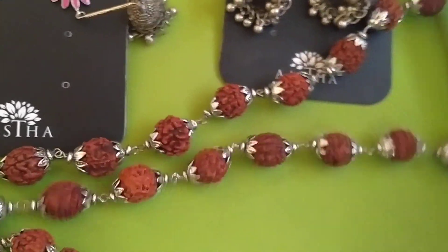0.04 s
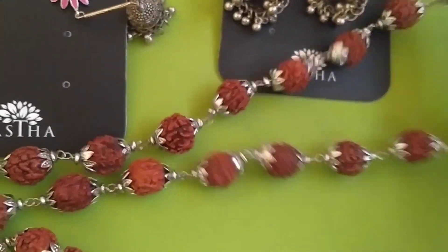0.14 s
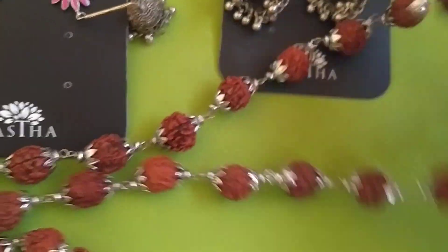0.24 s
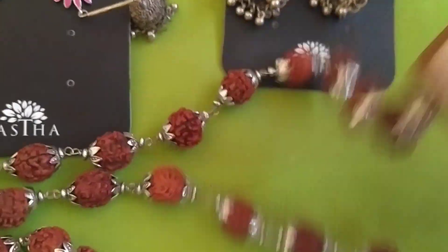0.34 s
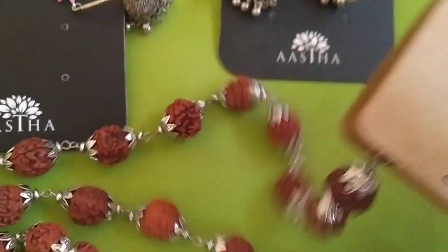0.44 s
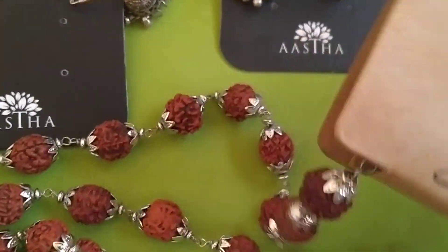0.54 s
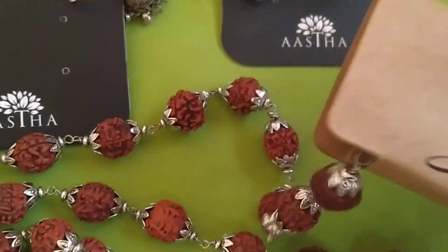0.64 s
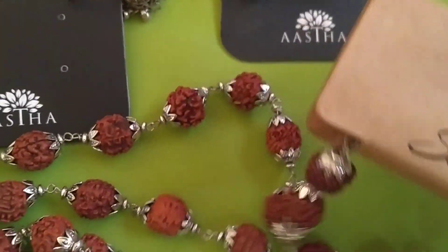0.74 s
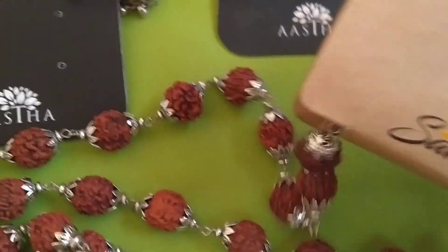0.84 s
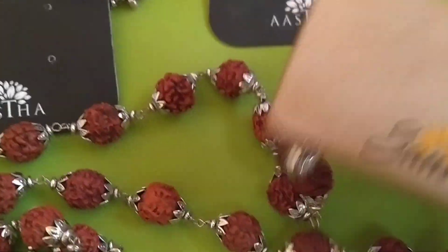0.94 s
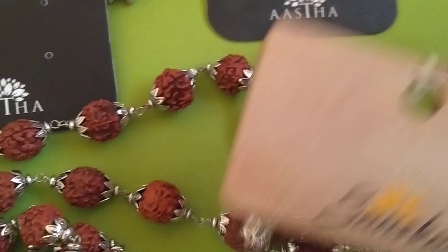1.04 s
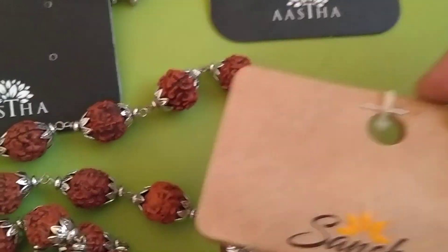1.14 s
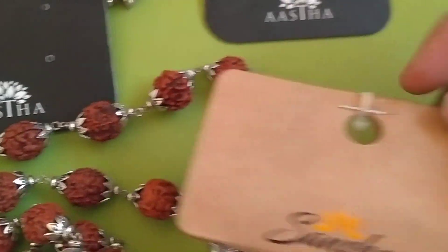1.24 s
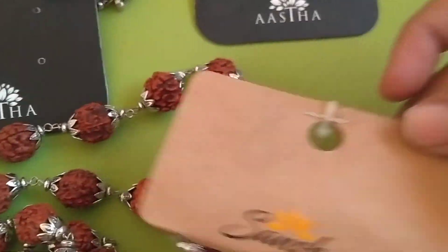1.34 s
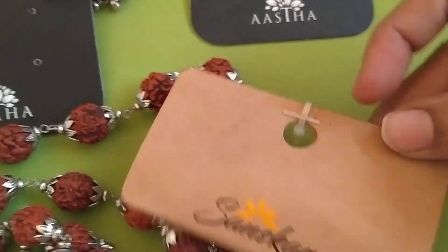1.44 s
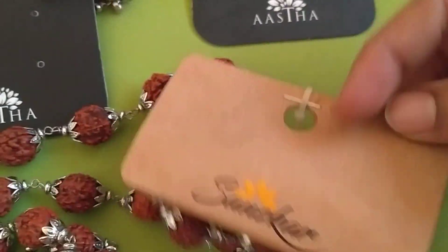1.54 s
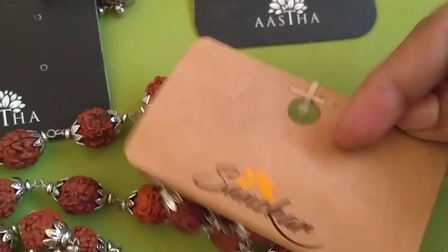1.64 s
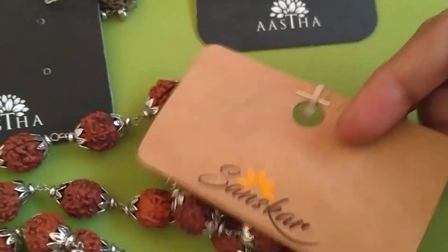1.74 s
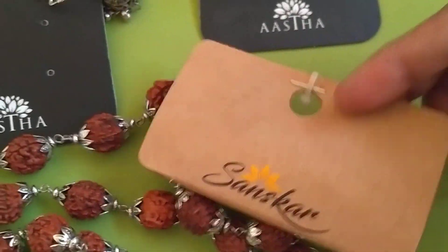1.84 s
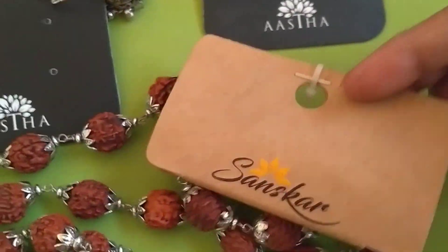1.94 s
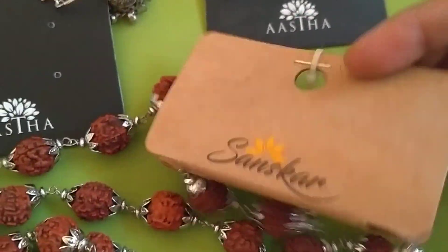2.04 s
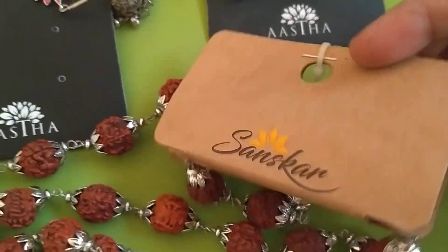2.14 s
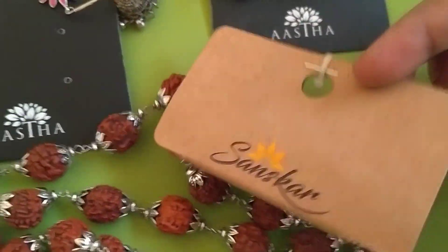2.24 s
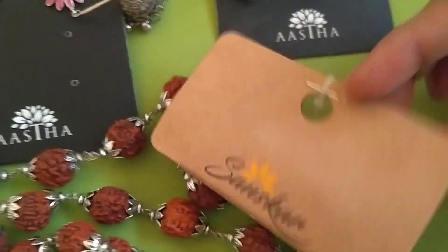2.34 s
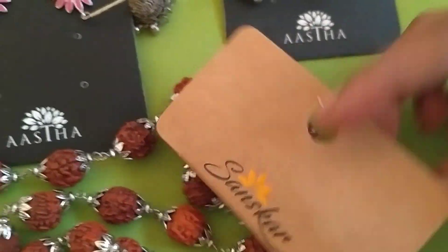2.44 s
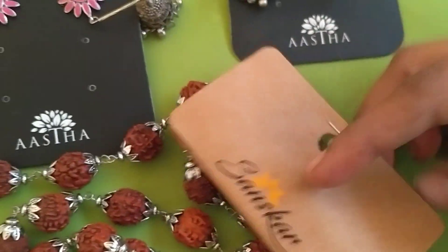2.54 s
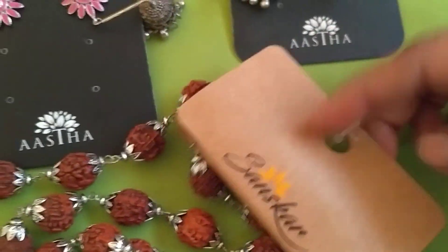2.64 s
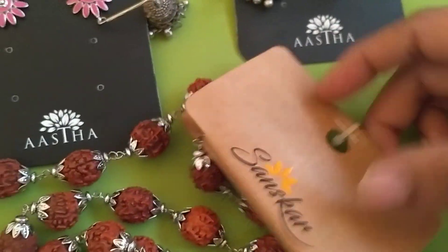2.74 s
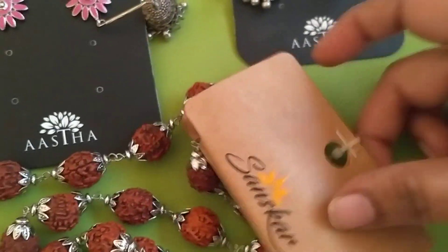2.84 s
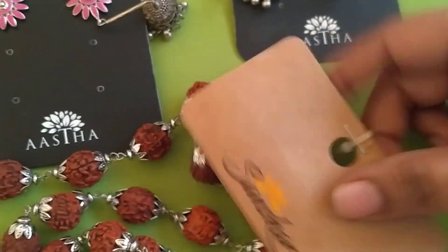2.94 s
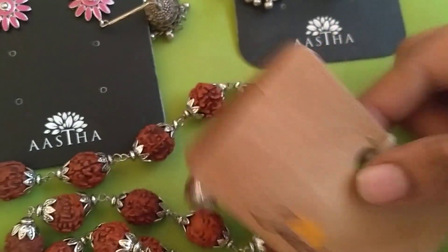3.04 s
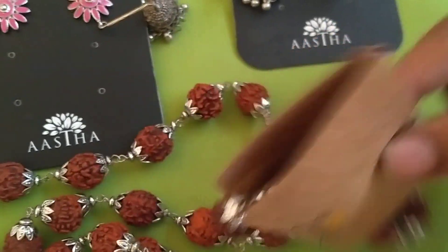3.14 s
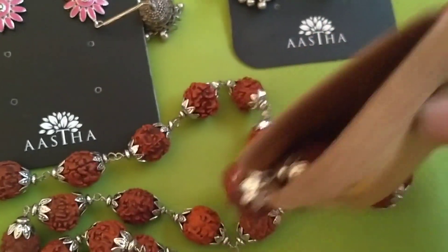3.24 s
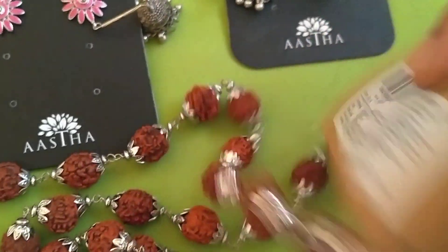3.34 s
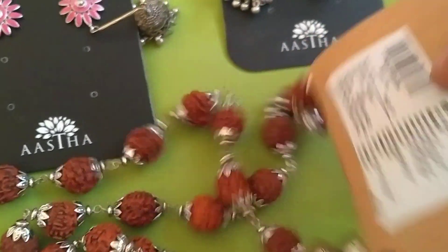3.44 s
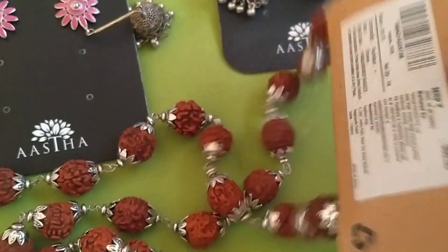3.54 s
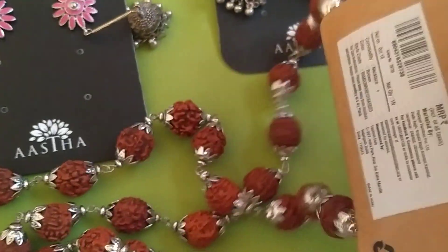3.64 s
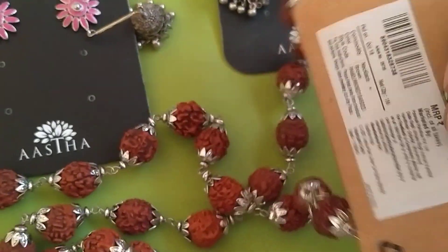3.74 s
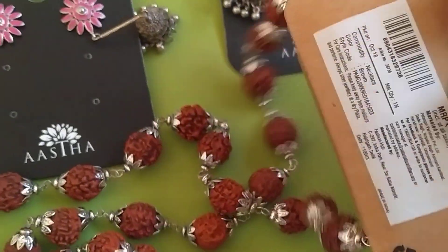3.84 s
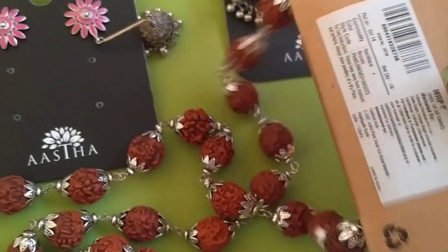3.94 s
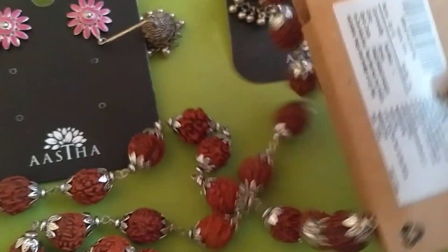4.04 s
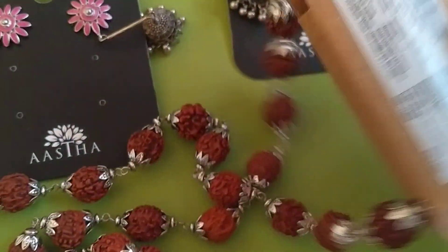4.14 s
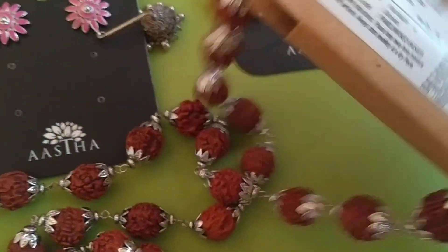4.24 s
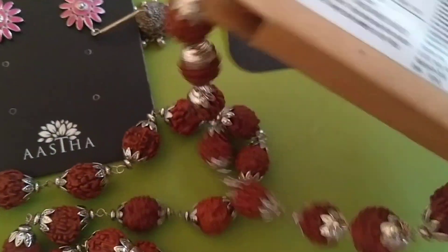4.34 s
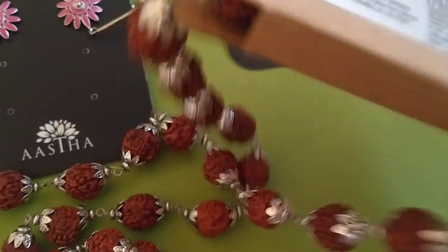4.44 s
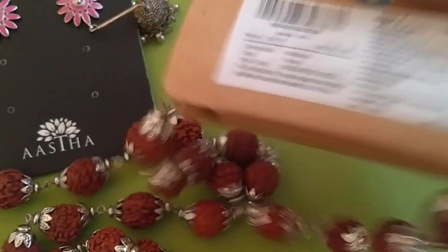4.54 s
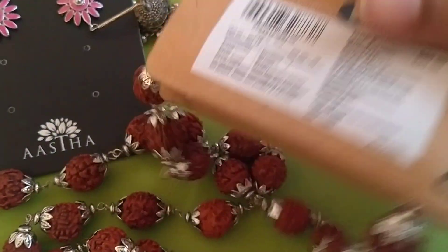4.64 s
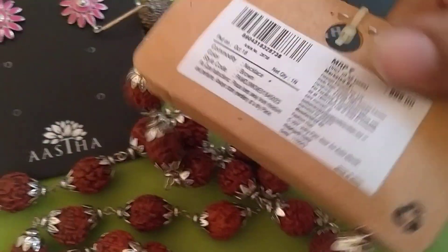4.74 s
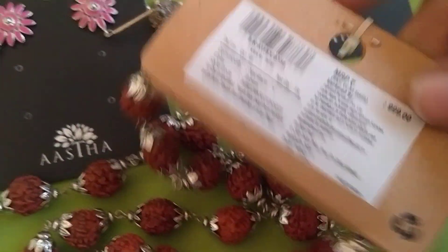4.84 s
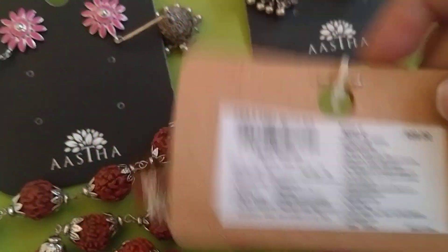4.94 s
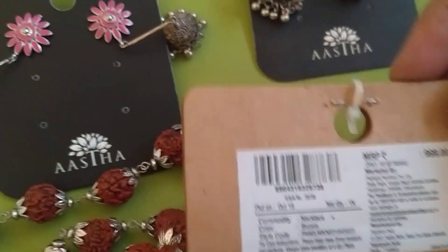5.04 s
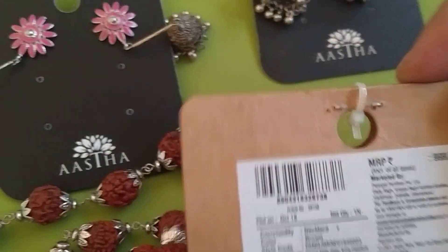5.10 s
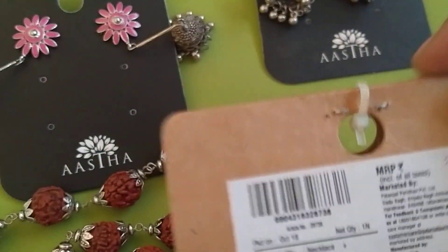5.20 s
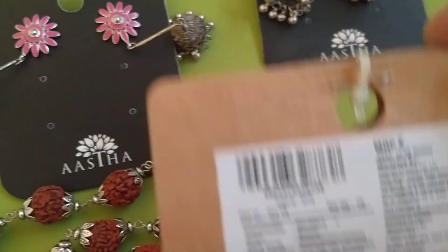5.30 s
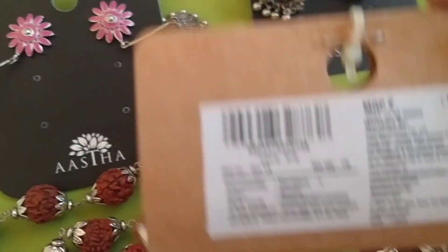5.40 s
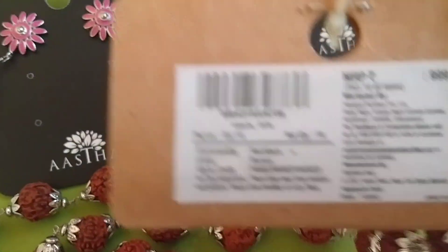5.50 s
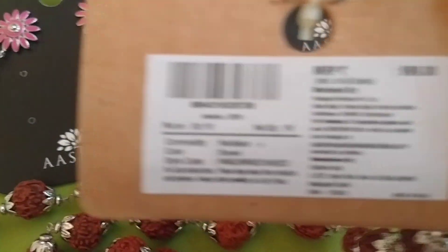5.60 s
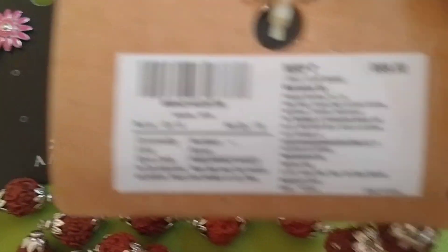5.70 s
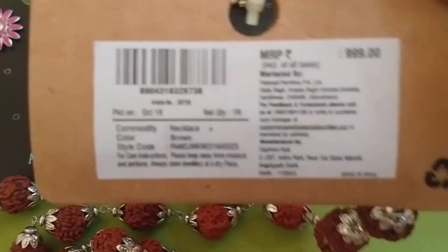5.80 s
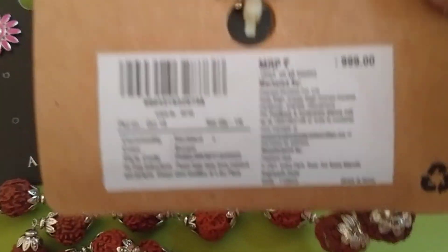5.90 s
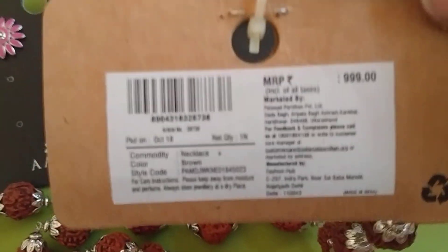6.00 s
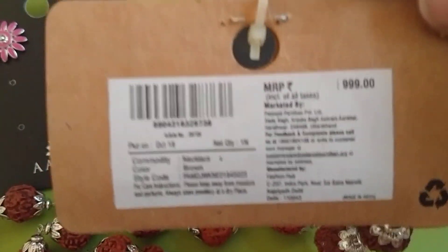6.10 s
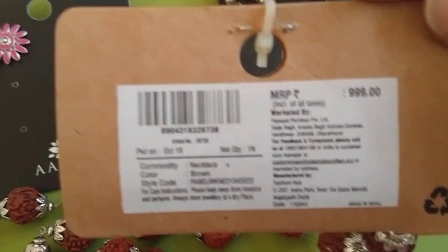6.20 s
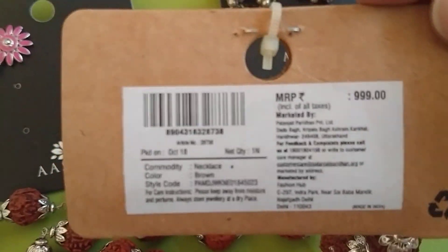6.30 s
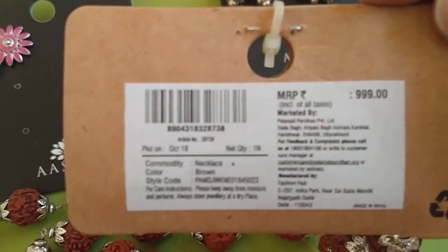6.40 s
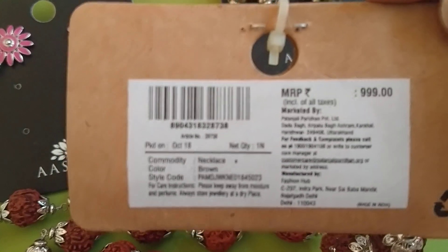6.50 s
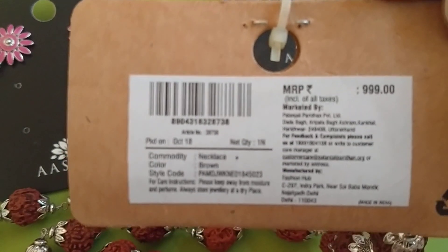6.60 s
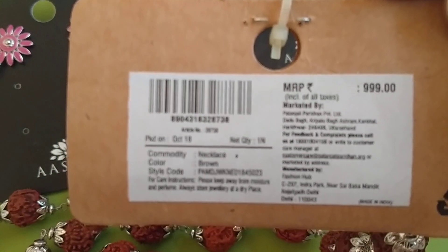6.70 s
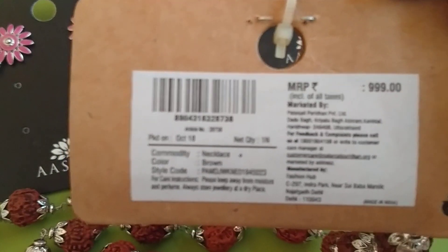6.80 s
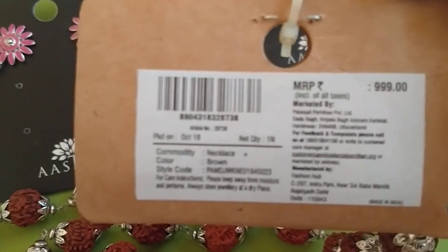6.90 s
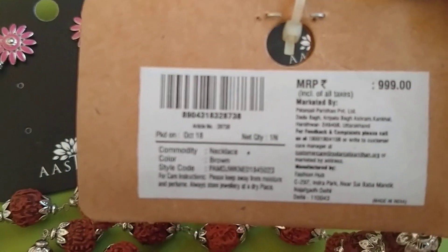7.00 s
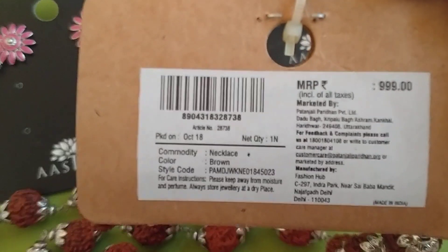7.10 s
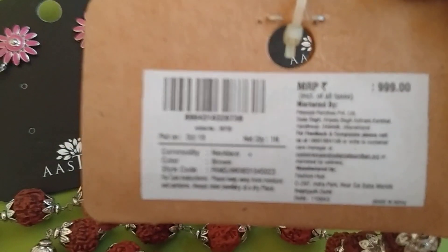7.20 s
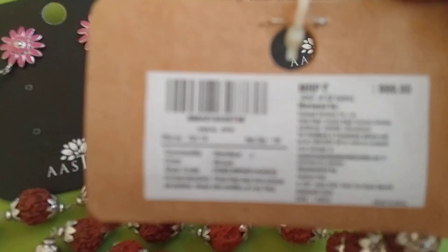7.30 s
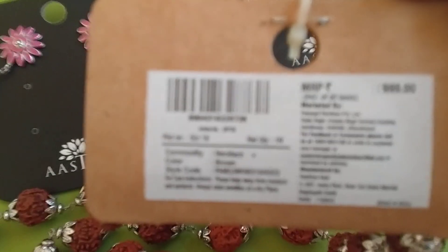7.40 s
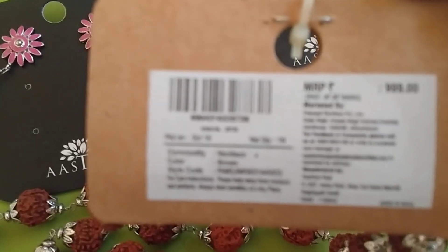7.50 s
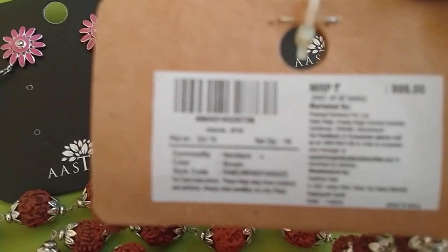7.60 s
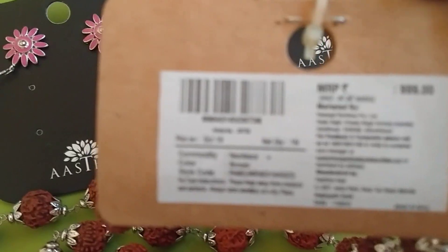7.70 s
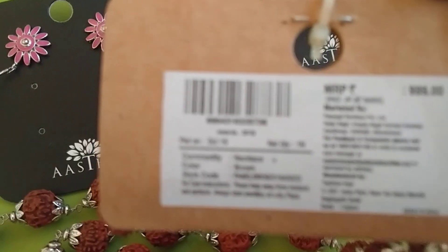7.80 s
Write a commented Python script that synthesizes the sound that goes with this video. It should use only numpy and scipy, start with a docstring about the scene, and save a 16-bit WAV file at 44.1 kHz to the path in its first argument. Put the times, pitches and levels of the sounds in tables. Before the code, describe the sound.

Hard beads knock and rattle irregularly on a tabletop, with small metallic ticks and a light rustle of card in a quiet room.

```python
"""Seed beads on a hollow table

A string of hard beads with metal caps is dragged and dropped while fingers turn its cardboard tag.
Impacts excite the board's short-lived modes; caps, links and card add a thin bright rustle with ticks.
The small room hums, and the close microphone's expander sinks the floor once the hands are still."""
import sys
import numpy as np
from scipy import signal
from scipy.fft import rfft, irfft, next_fast_len
from scipy.io import wavfile
from scipy.ndimage import uniform_filter1d

SR = 44100
rng = np.random.default_rng(int(sys.argv[2]) if len(sys.argv) > 2 else 0)


def digitize_waveform(pressure):
    """Quantize a signal to 16-bit integers and store it at the path in sys.argv[1].

    Rows of a 2-D input are taken as channels; values are limited to [-1, 1].
    """
    field = np.atleast_2d(pressure).T
    bounded = np.clip(field, -1, 1)
    quanta = np.round(bounded * 32767).astype(np.int16)
    wavfile.write(sys.argv[1], SR, quanta)


N = 346405

# Bead impacts. Each row: start in seconds, level in dB, gain of the modes above 1.8 kHz in dB.
BEAD_KNOCKS = [(0.106, -32, -26), (0.131, -20, -27), (0.162, -19, -25), (0.195, -25, -23), (0.279, -26, -7),
               (0.329, -27.5, -9), (0.368, -25.5, -21), (0.409, -30, -10), (0.468, -14.5, -17.5),
               (0.497, -24.5, -18), (0.525, -11, -17.5), (0.557, -14.5, -21.5), (0.583, -19, -19),
               (0.607, -15.5, -32), (0.653, -23.5, -7), (0.846, -29, -12), (0.9, -33, -9),
               (0.916, -20, -13.5), (0.993, -31, -29), (1.12, -35, -21), (1.132, -32.5, -9),
               (1.159, -34, -8), (1.172, -31.5, -6), (1.198, -11, -10), (1.219, -25, -16),
               (1.243, -25, -30), (1.28, -31, -30), (1.316, -30.5, -29), (1.357, -27.5, -33),
               (1.417, -37, -18), (1.449, -39, -4), (1.501, -33, -25), (1.519, -23, -21), (1.6, -23.5, -18),
               (1.692, -27.5, -12), (1.777, -23.5, -27), (1.795, -17, -23), (1.824, -26.5, -18),
               (1.866, -25.5, -18), (1.892, -27, -20), (1.904, -25, -6), (2.145, -31, -18),
               (2.169, -21.5, -15), (2.211, -13.5, -10.5), (2.267, -29.5, -15), (2.338, -27.5, -21),
               (2.355, -31, -4), (2.367, -22, -11.5), (2.445, -47, -6), (2.473, -16, -8.5),
               (2.498, -17, -7.5), (2.516, -25, -14), (2.535, -33, -23), (2.611, -28.5, -16),
               (2.871, -32, -14), (2.919, -31, -19), (2.976, -35.5, -4), (3.031, -34, -14),
               (3.045, -20, -15), (3.092, -34, -31), (3.119, -43, -15), (3.148, -13, -25),
               (3.163, -13, -12), (3.177, -11, -12), (3.218, -21, -14), (3.231, -18, -19),
               (3.269, -14.5, -14), (3.286, -16, -6), (3.308, -16, -10), (3.323, -26, -23),
               (3.39, -31, -21.5), (3.457, -44, -22.5), (3.482, -31, -5), (3.501, -14.5, -14),
               (3.518, -19, -10), (3.531, -14.5, -17), (3.58, -12.5, -20), (3.597, -13.5, -11),
               (3.646, -15, -14), (3.677, -15, -23), (3.696, -22, 1), (3.808, -34, -10), (3.831, -36.5, 3),
               (3.9, -37, -12), (3.932, -31, -19), (3.986, -18.5, -12.5), (4.105, -41, 12.5),
               (4.233, -13, -12.5), (4.273, -24, -30), (4.35, -30.5, -4), (4.447, -30.5, -19.5),
               (4.548, -33, -12), (4.576, -20.5, -13), (4.622, -10.5, -18.5), (4.65, -21.5, -18),
               (4.669, -11.5, -1), (4.673, -10, -9.5), (4.691, -9, -13), (4.695, -16, -6),
               (4.729, -20.5, -11.5), (4.819, -15, -19), (4.957, -32.5, -22), (4.993, -34, -18),
               (5.006, -35, -24), (5.075, -30, -16), (5.087, -37, -8), (5.118, -24, -17), (5.137, -21, -36),
               (5.227, -34.5, -14), (5.249, -46, -12), (5.286, -31, -10), (5.299, -35, -11),
               (5.37, -40.5, -14), (5.441, -36.5, -9), (5.571, -44, 4.5), (5.649, -49, -7),
               (5.979, -57.5, -23)]
# Modes of the table top. Each row: frequency in Hz, relative level in dB, T60 in seconds.
BOARD_MODES = [(200, -20.5, .05), (310, -35, 0.032), (396, -1.5, 0.063), (514.3, -13, 0.088),
               (643, -2, 0.081), (706, -4.5, 0.061), (784, 2.5, 0.043), (901, -5, 0.061), (1041, 2.5, 0.03),
               (1193, -1, 0.042), (1329, -9.5, 0.088), (1493, -11, 0.071), (1614, 3, 0.013),
               (1897, -0.5, 0.043), (2130, 5, 0.022), (2356, 8.5, 0.011), (2693, -10, 0.066),
               (2810, 0.5, 0.016), (3064, -10.5, 0.048), (3400, -1, 0.0083), (3870, -15.5, 0.021)]
def board(rattling, bright_share, bump_gap_s=.003):
    """Modal excitation: knocks and rattle drive each mode with a strength set by the spot struck."""
    start, knock_db, high_db = np.transpose(BEAD_KNOCKS)
    gaps = bump_gap_s * rng.random((len(start), 3))   # a knobbly bead lands on four bumps in turn
    delays = np.cumsum(np.c_[0 * start, gaps], axis=1)
    bumps = np.round((start[:, None] + delays) * SR).astype(int)
    coupling = 0.16 + 0.49 * rng.normal(0, 1, (len(start), 4, len(BOARD_MODES)))
    rattle, spot = contacts(per_s=2300, spread_db=2.0), rng.standard_normal(N)
    rolled, knocked = np.zeros(N), np.zeros(N)
    for k, (hz, mode_db, t60) in enumerate(BOARD_MODES):
        share_db = -22.5 if hz < 450 else high_db if hz > 1800 else 0
        rattle_share = from_db(-13) if hz < 450 else bright_share if hz > 1800 else 1
        strength = from_db(knock_db + share_db + mode_db - 5.5)
        impulses = np.zeros(N)
        impulses[bumps] = coupling[..., k] * strength[:, None] * [0.82, -0.29, 0.3, -.35]
        knocked += ring(impulses, hz, t60)
        taps = rattle * np.roll(spot, 997 * k) * from_db(mode_db) * rattle_share
        rolled += ring(taps, hz, 0.79 * t60)
    running_rms = np.sqrt(uniform_filter1d(rolled ** 2, size=1500))
    vibration = knocked + rattling * rolled / running_rms   # the hand sets the strength, not the count
    soft_contact = signal.butter(4, 4300, fs=SR, output="sos")       # seed on wood
    radiation = signal.butter(4, 260, "high", fs=SR, output="sos")   # a small board radiates no bass
    return signal.sosfilt(np.r_[soft_contact, radiation], vibration)


def settling(t60=0.18):
    """Exponential decay: the envelope of neighbouring beads that each knock jolts."""
    start, knock_db, _ = np.transpose(BEAD_KNOCKS)
    jolts = np.zeros(N)
    jolts[np.round(start * SR).astype(int)] = from_db(knock_db - 17)
    return signal.lfilter([1], [1, -from_db(-60 / (t60 * SR))], jolts)


# Pulls on the string and turns of the tag. Each row: start and length in seconds,
# then levels in dB of the rattle, the rustle and the rattle above 1.8 kHz.
HAND_PULLS = [(.0, 0.16, -57.5, -59, -53), (0.138, 0.029, -37, -64, -46), (0.246, 0.14, -44, -88, -64),
              (0.35, 0.016, -45, -62, -51), (0.509, 0.12, -35, -57, -42), (0.914, 0.065, -46, -64, -62),
              (1.13, 0.032, -57, -72, -67), (1.211, 0.02, -43, -59.5, -70), (1.533, 0.079, -46.5, -71, -67),
              (1.777, 0.2, -48, -66.5, -63), (2.171, 0.074, -46.5, -65, -63), (2.364, 0.025, -52, -64, -65),
              (2.494, 0.034, -34.5, -55, -45), (2.604, 0.029, -46, -67.5, -63),
              (2.886, 0.02, -47.5, -59.5, -53.5), (3.069, 0.056, -68, -55.5, -68),
              (3.148, 0.031, -28, -46, -48), (3.227, 0.061, -28.5, -47.5, -36), (3.5, 0.09, -31, -50, -42),
              (3.66, 0.072, -43.5, -62, -51), (3.814, 0.025, -47.5, -65, -54),
              (3.966, 0.019, -60, -56.5, -68), (4.063, 0.038, -55, -58, -57),
              (4.168, 0.02, -37.5, -65, -53), (4.243, 0.028, -45.5, -54.5, -53),
              (4.416, 0.2, -49, -63, -68), (4.609, 0.013, -45.5, -43, -51),
              (4.688, 0.036, -29.5, -42, -32.5), (4.827, 0.26, -51, -56, -73), (5.12, .03, -58, -71, -66),
              (5.2, 0.16, -51, -78.5, -66), (5.58, 0.039, -67, -74, -66.5), (5.713, .03, -62.5, -80, -83),
              (6.05, .05, -77, -90.5, -83)]
# The held string is never quite still. Each row: time in seconds, then the same three levels in dB.
HAND_UNREST = [(0, -75, -73, -70), (1.1, -71, -76, -85), (1.6, -48.5, -76, -65), (2.1, -62.5, -90, -74),
               (3.0, -71, -74, -72.5), (3.9, -54.5, -65.5, -70), (4.5, -49.5, -73.5, -62),
               (5.3, -62, -73.5, -68.5), (5.8, -74.5, -89, -82), (6.3, -81.5, -94.5, -99.5)]
def pulling(layer, rise_db_per_s=204, fall_db_per_s=110):
    """Addition of powers: a layer's envelope, as pulls swell, hold and fade over the restless string."""
    t = np.arange(0, N, 32) / SR
    power = from_db(2 * level_curves(HAND_UNREST)[layer][::32])
    for start, length, *levels_db in HAND_PULLS:
        rise_db = rise_db_per_s * np.maximum(start - t, 0)
        fall_db = fall_db_per_s * np.maximum(t - start - length, 0)
        power += from_db(2 * (levels_db[layer] - rise_db - fall_db))
    return np.interp(np.arange(N) / SR, t, np.sqrt(power))


# Spectrum of card, caps and links. Each row: frequency in Hz, relative spectral density in dB.
RUSTLE_SPECTRUM = [(1880, -10), (3200, 3), (3400, -0.5), (4070, -11), (5110, -7.5), (5570, -10.5),
                   (6280, -9.5), (6900, -10.5), (7430, -6.5), (7890, -10.5), (8660, -3), (10400, -13.5),
                   (11600, -16.5), (15100, -11), (15800, -24.5)]
def rustle(ring_cycles=90):
    """Friction noise: card and fingers slide with a hiss while random contacts ring the links."""
    glints, link_struck = contacts(per_s=810, spread_db=4.5), rng.integers(0, 18, N)
    links = 0
    for k, hz in enumerate(np.geomspace(4400, 14500, num=18)):
        level_db = np.interp(hz, *np.transpose(RUSTLE_SPECTRUM))
        links += from_db(level_db) * ring(glints * (link_struck == k), hz, ring_cycles / hz)
    return unit_rms(shaped_noise(RUSTLE_SPECTRUM) + from_db(-8.5) * unit_rms(links))


# Ticks of caps and card edge. Each row: start in seconds, level in dB, clink frequency in Hz,
# relative clink level in dB, treble tilt about 8 kHz in dB.
EDGE_TICKS = [(0.0179, -51, 8700, -11, 3), (0.0355, -42.5, 4530, -3, 0), (0.316, -53, 4700, -1, -2),
              (0.3325, -36.5, 4500, -11, -4), (0.4145, -40.5, 4470, -2, -6), (0.4678, -33, 4800, -17, -5),
              (0.5063, -38, 4590, -8, -4), (0.5252, -40, 4340, -1, -2), (0.5624, -47, 5210, -3, 1),
              (0.6572, -43.5, 8510, -1, 3), (0.7811, -52, 7280, -11, 4), (0.9014, -54, 4350, -7, 3),
              (0.9742, -52, 8590, -2, 1), (1.1223, -57, 7000, -5, 2.5), (1.1737, -53, 4600, -5, 3),
              (1.1985, -31, 8470, -15, 6), (1.3465, -59, 8710, -5, 6), (1.3553, -60, 5750, -7, 5),
              (1.5212, -43.5, 4560, 2, -9), (1.5999, -40.5, 4670, -7, -3), (1.6556, -55, 8000, -5, 3),
              (1.6901, -54.5, 4600, -2, 1), (1.7923, -40, 4870, 4, 2), (1.8248, -42.5, 5200, 3, -1),
              (1.8552, -40.5, 5800, 3, 4), (1.8896, -41, 5100, -4, 1), (1.9044, -48, 8400, -5, 3),
              (2.145, -53, 8600, -13, 6), (2.17, -53, 9010, -5, 3), (2.2099, -35.5, 8300, -4, 1),
              (2.356, -40, 9020, -9, -2), (2.4457, -48, 8510, -7, 3), (2.4743, -32.5, 4800, -1, -1),
              (2.5003, -30, 5160, -17, 1), (2.5411, -47, 9000, -1, 3), (2.6584, -50, 8820, -11, 1),
              (2.8055, -63, 6540, 2, 1), (2.8475, -52, 6500, -1, 0), (3.029, -54, 4830, -7, 1),
              (3.049, -41, 8200, -2, 2), (3.0844, -44, 8900, -4.5, 5), (3.1552, -35, 4730, -1, -10),
              (3.1794, -24.5, 4740, -16, -5), (3.2296, -34, 4750, 1, -1), (3.2414, -32, 4740, 0, 1),
              (3.2868, -34, 4650, 4, 0), (3.4487, -44, 9160, -5, 6), (3.4815, -39, 4800, -3, 3),
              (3.4944, -39.5, 4990, -5, 3), (3.5572, -29, 6700, -5, 3), (3.5964, -41, 4830, -5, 5),
              (3.7, -35, 4760, -2, -3), (3.7918, -49, 5660, -3, -1), (3.8327, -40.5, 5070, -1, -7),
              (3.85, -44.5, 4650, 1, -2), (3.9444, -50, 9460, -5, 3), (3.9759, -46, 9500, 5, 7),
              (4.06, -42, 8700, -12, 3), (4.0996, -38, 9800, 1, 8), (4.1065, -36, 8100, 1, 8),
              (4.232, -41, 9400, -10, 6), (4.3784, -48.5, 8800, -5, 1), (4.4024, -53, 8580, -5, 6),
              (4.4283, -51, 9000, -9, 3), (4.5062, -50, 8400, -7, 8), (4.563, -45.5, 5150, -5, 3),
              (4.5754, -39.5, 5115, -3.5, 6), (4.6134, -32.5, 5190, -5.5, 0), (4.6743, -19.5, 8200, 0, -3),
              (4.6967, -19, 5040, -2, -8), (4.82, -35.5, 4250, 1, -2), (4.8484, -42, 8600, -5, 3),
              (5.0649, -47, 8740, 4, 6), (5.1372, -54, 4320, -5, 3), (5.3083, -55, 8960, -5, 3),
              (5.5712, -57, 9040, -5, 6), (5.7207, -56, 10400, 5, 6), (5.7354, -54, 8600, -1, 11),
              (5.7514, -58, 8600, -5, 9), (6.3854, -58.5, 8990, -4.5, 3.5)]
def ticks(burst_t60=0.021, clink_t60=0.0088):
    """Impact transients: each is a broadband burst and the brief ring of two modes of a cap."""
    out, hiss = np.zeros(N), shaped_noise(RUSTLE_SPECTRUM)
    dull = signal.sosfilt(signal.butter(2, 8000, fs=SR, output="sos"), hiss)
    t = np.arange(4000) / SR
    attack = 1 - np.exp(-t / .0007)
    for start, level_db, hz, clink_db, tilt_db in EDGE_TICKS:
        span = slice(round(start * SR), round(start * SR) + len(t))
        burst = from_db(-tilt_db / 2) * dull[span] + from_db(tilt_db / 2) * (hiss[span] - dull[span])
        clink = np.sin(2 * np.pi * hz * t) + 0.56 * np.sin(2 * np.pi * 0.67 * hz * t)
        out[span] += attack * burst * from_db(level_db - 3.5 - 60 * t / burst_t60)
        out[span] += attack * clink * from_db(level_db + clink_db - 60 * t / clink_t60)
    return out


# Caps striking beads. Each row: start in seconds, level in dB, frequency in Hz, T60 in seconds.
CAP_CLINKS = [(0.1263, -42.5, 3400, 0.099), (0.331, -36, 2940, 0.072), (3.448, -42.5, 9350, .06),
              (3.8317, -30, 2670, 0.017), (4.106, -38, 3220, 0.059), (4.6193, -33.5, 2660, 0.05),
              (5.5718, -66, 3240, 0.046)]
def clinks():
    """Free vibration: a struck cap rings down in a single mode."""
    out = np.zeros(N)
    for start, level_db, hz, t60 in CAP_CLINKS:
        impulse = np.zeros(N)
        impulse[round(start * SR)] = from_db(level_db - 4.5)
        out += ring(impulse, hz, t60)
    return out


# Hands and arms resting on the table. Each row: time in seconds, rumble level in dB.
ARM_LEVELS = [(0.0, -64), (0.86, -64.5), (1.16, -66), (1.21, -52), (1.26, -65), (1.74, -70), (1.81, -54),
              (2.03, -64), (3.12, -58), (3.18, -48.5), (3.4, -67), (3.6, -56.5), (4.53, -65.5),
              (4.67, -59.5), (4.91, -62.5), (6.3, -78.5)]
# Spectrum of their rumble. Each row: frequency in Hz, relative spectral density in dB.
RUMBLE_SPECTRUM = [(24, -32), (40, -24), (124, 9.5), (210, 7), (330, 0), (430, -23.5), (730, -120)]
def rumble(rattling):
    """Forced vibration: arms and rattling beads shake the table and its lowest resonance."""
    broadband = shaped_noise(RUMBLE_SPECTRUM)
    resonance = wavering_tone(rng.standard_normal(N), hz=197, width_hz=5, level_db=-4)
    shaking = np.hypot(from_db(level_curves(ARM_LEVELS)[0]), from_db(-30) * rattling)
    return shaking * (broadband + resonance)


def room(x, t60=0.22, wall_cut_hz=4400):
    """Reverberation: echoes circle in ten feedback delays of unrelated length, duller on every round."""
    size = next_fast_len(N + SR)
    phase = -2j * np.pi * np.fft.rfftfreq(size)
    pole = np.exp(-2 * np.pi * wall_cut_hz / SR)
    wall = (1 - pole) / (1 - pole * np.exp(phase))
    tail = 0
    for k, lag in enumerate([311, 419, 523, 647, 761, 887, 1013, 1151, 1283, 1427]):
        loop = from_db(-60 * lag / SR / t60) * wall * np.exp(phase * lag)
        tail += (-1) ** k * loop / (1 - loop)
    return irfft(rfft(x, size) * tail, size)[:N]


# Air of the room. Each row: frequency in Hz, relative spectral density in dB.
AIR_SPECTRUM = [(13, -59.5), (22, -30), (59, -21.5), (92, -14.5), (112, -8.5), (199, -6.5), (248, -8.5),
                (269, -17), (345, -13), (507, -23), (787, -23.5), (855, -24), (1750, -28.5), (7940, -46.5),
                (15800, -38.5)]
# Tones of the hum. Each row: frequency in Hz, bandwidth in Hz, relative level in dB.
HUM_TONES = [(128, 14, -9), (146.3, 4.8, -32.5), (192, 4.1, 2), (250, 13, -4.5)]
def hum():
    """Stationary noise: the steady air of the room with a few wavering low tones."""
    white = rng.standard_normal(N)
    tones = sum(wavering_tone(white, *tone) for tone in HUM_TONES)
    return from_db(-66.5) * (shaped_noise(AIR_SPECTRUM) + from_db(-16.5) * tones)


def wavering_tone(white, hz, width_hz, level_db):
    """Narrowband resonance: noise through a sharp filter is heard as a wavering tone."""
    r = np.exp(-np.pi * width_hz / SR)
    poles = [1, -2 * r * np.cos(2 * np.pi * hz / SR), r * r]
    return from_db(level_db) * unit_rms(signal.lfilter([1, 0, -1], poles, white))


def ring(impulses, hz, t60):
    """Damped oscillator: a unit impulse starts a unit sine that falls 60 dB in t60 seconds."""
    r, w = from_db(-60 / (t60 * SR)), 2 * np.pi * hz / SR
    return signal.lfilter([0, np.sin(w)], [1, -2 * r * np.cos(w), r * r], impulses + 1e-18)


def contacts(per_s, spread_db):
    """Poisson process: random contacts, many weak and a few strong."""
    sizes = from_db(spread_db * np.minimum(rng.exponential(1, N), 4))
    return unit_rms(sizes * (rng.random(N) < per_s / SR))


def shaped_noise(spectrum):
    """Spectral shaping: white noise takes on the given spectrum, at rms 1."""
    bins_hz = np.maximum(np.fft.rfftfreq(N, 1 / SR), 1)
    hz, db = np.transpose(spectrum)
    shape = from_db(np.interp(np.log(bins_hz), np.log(hz), db, left=-80))
    return unit_rms(irfft(rfft(rng.standard_normal(N)) * shape, N))


def level_curves(rows):
    """Linear interpolation: each dB column at every sample, silent after the last row."""
    times, *columns = np.transpose(rows)
    return [np.interp(np.arange(N) / SR, times, db, right=-140) for db in columns]


def from_db(db):
    """Decibel law: the amplitude ratio of a level."""
    return 10 ** (np.asarray(db) / 20)


def unit_rms(x):
    """Normalisation to rms 1."""
    return x / np.sqrt(np.mean(x ** 2) + 1e-20)


def scene():
    """Superposition: board, rustle, ticks and clinks sound in the room, over rumble and hum."""
    jolted = settling()
    rattling = np.hypot(pulling(layer=0), jolted)
    rustling = pulling(layer=1, rise_db_per_s=349, fall_db_per_s=194)
    bright = np.hypot(pulling(layer=2), from_db(-12) * jolted)
    direct = board(rattling, bright / rattling) + rustling * rustle() + ticks() + clinks()
    return (direct + from_db(-18.5) * room(direct) + rumble(rattling) + hum())[None]


def record(dry, threshold_db=-68.5, cutoff_hz=16150):
    """Downward expansion: gain drops when the short-term level is under threshold; a low-pass follows."""
    level_pole, gain_pole = np.exp(-1 / (.003 * SR)), np.exp(-1 / (.0015 * SR))
    power = signal.lfilter([1 - level_pole], [1, -level_pole], dry ** 2)
    level_db = 10 * np.log10(power + 1e-14)
    gain_db = np.clip(4.0 * (level_db - threshold_db), -30, 0)
    expanded = dry * from_db(signal.lfilter([1 - gain_pole], [1, -gain_pole], gain_db))
    return signal.sosfilt(signal.cheby2(20, 60, cutoff_hz, fs=SR, output="sos"), expanded)


dry = scene()
out = record(dry)
digitize_waveform(out)
```